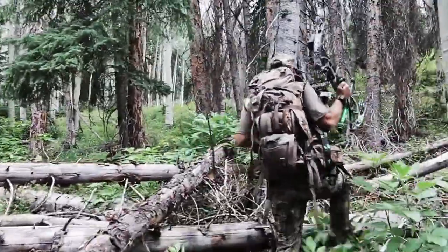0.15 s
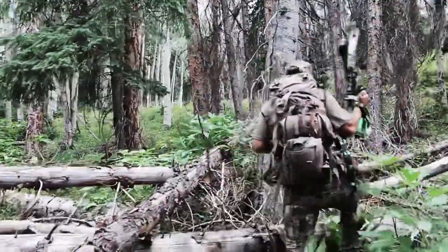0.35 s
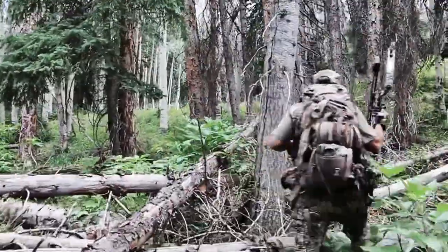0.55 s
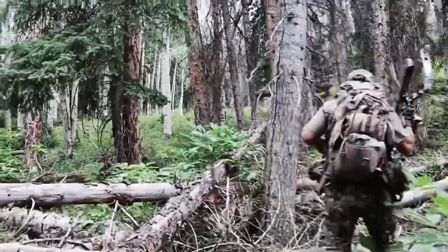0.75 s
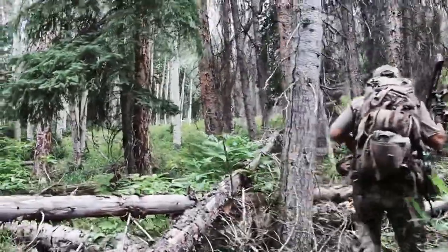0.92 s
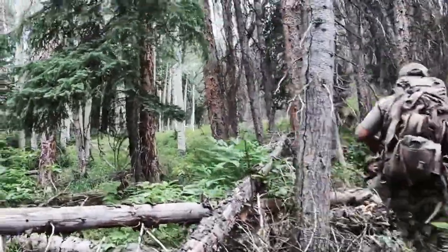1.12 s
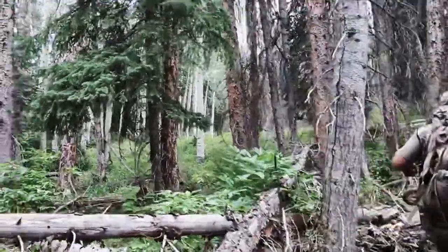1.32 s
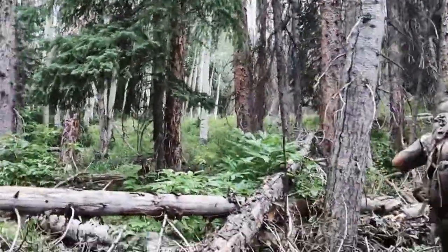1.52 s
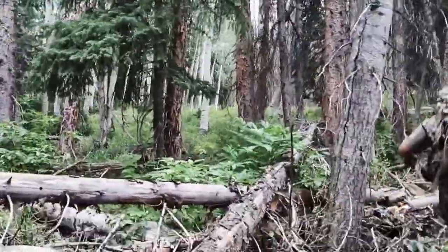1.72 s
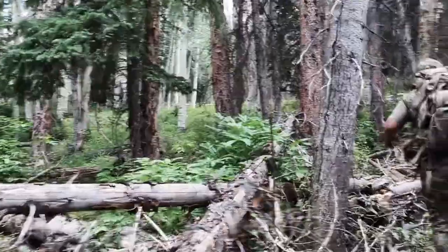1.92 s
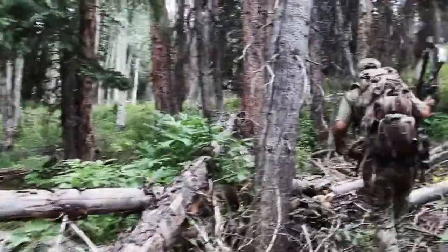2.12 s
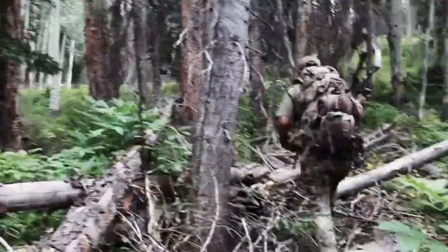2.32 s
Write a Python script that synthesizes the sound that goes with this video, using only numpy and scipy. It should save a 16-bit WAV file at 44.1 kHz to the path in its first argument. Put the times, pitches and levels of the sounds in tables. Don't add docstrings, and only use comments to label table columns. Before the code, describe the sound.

Close, dry stereo sound of boots breaking deadwood on a forest floor: small snaps, a loud hollow break, another cracking step, scattered ticks, then the sharpest crack and settling litter, over very faint low air.

```python
import sys
import numpy as np
from scipy import signal
from scipy.fft import rfft, irfft, next_fast_len
from scipy.io import wavfile
from scipy.ndimage import uniform_filter1d, map_coordinates

SR = 44100
rng = np.random.default_rng(int(sys.argv[2]) if len(sys.argv) > 2 else 0)


def linear_from_db(decibels):
    return 10 ** (np.asarray(decibels, float) / 20)


def int16_out(signal):
    q = np.round(np.clip(np.atleast_2d(signal).T, -1, 1) * 32767)
    wavfile.write(sys.argv[1], SR, q.astype(np.int16))


N = 103635

# (frequency [Hz], density [dB per Hz])
BUFFET_SPECTRUM = [(20, -12), (60, -2), (150, 4), (400, -36), (600, -120)]
# (time [s], litter pressure [dB], leaf brushing [dB])
STRIDE_LEVELS = [(0,-43,-47.5),(.185,-39.5,-48),(.23,-33,-43.5),(.33,-31,-45),(.45,-37,-46.5),(0.529,-25.5,-36),(.66,-40,-47.5),(.75,-39,-48.5),(.83,-46,-46),(1.05,-36,-41.5),(1.12,-33.5,-46),(1.27,-41.5,-52),(1.45,-39,-53),(1.56,-38,-48),(1.75,-42,-48),(1.89,-41,-40),(1.97,-42,-48),(2.1,-46,-42.5),(2.35,-39.5,-51)]
# (frequency [Hz], density [dB per Hz])
LITTER_SPECTRUM = [(15, -56), (25, -41), (106, -1), (374, -1), (894, -5.5), (1000, -0.5), (1410, -6.5),
                   (3090, -12.5), (6000, -20.5), (7800, -38), (13200, -120)]
# (frequency [Hz], density [dB per Hz])
LEAF_SPECTRUM = [(1470, -5), (2500, -3), (4470, -6), (9140, -8), (13900, -14), (15500, -13.5), (16400, -30)]
# (frequency [Hz], width [Hz], gain [dB])
GEAR_RESONANCES = [(1250, 40, 3.5), (2970, 310, 0.5), (4940, 170, 3)]
# (frequency [Hz], correlation [0..1])
PORT_LIKENESS = [(30, 0.97), (500, 1), (1500, 0.97), (4000, 0.17), (12000, 0.059)]
# (time [s], peak [dB], pitch [Hz], life [cycles])
BOOT_KNOCKS = [(.013,-26,403,3.4),(.025,-23.5,395,4.9),(0.035,-28,407,3.2),(0.067,-32,294,3.8),(0.22,-29,390,1.5),(0.28,-36,490,4.1),(.305,-19.5,517,3),(.428,-27,580,3.5),(0.474,-22.5,393,2.4),(.478,-20,617,4),(0.512,-4.5,356,1.08),(.535,-15.5,143,2.1),(.632,-7,684,2),(0.65,-9,546,1.26),(0.713,-27,295,2.6),(0.72,-20.5,286,1.8),(0.7731,-19.5,770,1.35),(1.105,-21,604,3),(1.137,-35,596,4),(1.159,-16.5,634,1.5),(1.437,-13.5,298,1.35),(1.543,-31,143,2.8),(1.708,-15,396,1.1),(1.7854,-16,475,1.44),(1.8095,-10.5,690,2.5),(1.913,-16,754,1.67),(1.918,-21.5,142,1.26),(2.0559,-17.5,329,2),(2.062,-16,410,2),(2.080,-17,450,2.04),
               (.005,-37,118,2.7),(0.052,-39.5,87,4.2),(.12,-31.5,227,3.5),(.225,-29.5,158,2.8),(.776,-29.5,263,1.8),(1.537,-24,123,1.9),(1.5236,-16,890,1.8),(1.732,-29.5,377,3.5),(1.745,-27,750,2),(2.038,-25,600,1.5),(1.3775,-34,500,1.5),(2.10,-41,111,3.3),(2.24,-37,196,4.2),(0.331,-31,100,2),(.375,-38,110,1.9),(0.576,-29,80,3),(1.001,-38.5,71,2),(1.331,-40,205,4),(1.399,-37,70,1.7),(1.47,-34,45,2),(.102,-33,410,3.8),(1.442,-25.5,650,3.4),(1.453,-26.5,346,2),(0.7222,-34,500,1.5),(.756,-40,800,1.8),(1.604,-31,750,3.8),(2.283,-32,228,3.1)]
# (time [s], level [dB], t60 [s], brightness [dB per octave])
TWIG_SNAPS = [(0.169,-27,0.018,-4.5),(0.2015,-15,0.014,-2),(0.206,-17,.03,11),(0.2183,-25,.018,-5),(.286,-26,.012,-11),(0.3192,-24,.02,-0.5),(0.402,-21,0.032,-6.5),(0.4366,-25,0.019,3.5),(0.4717,-22.5,0.018,4),(0.4933,-17.5,0.035,-2),(0.5056,-6,0.023,-2),(.5234,-18.5,.03,-2),(.551,-22.5,0.016,1),(0.632,-26,0.011,2),(1.046,-36,.012,-7),(1.0802,-16.5,0.0076,2),(1.0888,-19,0.014,14),(1.0931,-13,.013,11),(1.139,-25.5,.01,-2),(1.1587,-11.5,0.008,-2),(1.1902,-20,0.0069,-4.5),(1.2137,-21.5,0.0066,-4.5),(1.232,-35,0.009,-2),(1.2442,-34,.012,8),(1.4133,-30,.015,-7),(1.437,-26.5,0.026,-7.5),(1.5223,-26,0.0083,-7),(1.5338,-25.5,.015,8),(1.5375,-28.5,0.023,8),(1.553,-23.5,.04,-4.5),(1.5786,-27,.015,-8),(1.6135,-22.5,.009,-4.5),(1.834,-38,0.01,1),(1.853,-14.5,0.0094,16),(1.912,-9.5,.016,-2),(1.915,-27,0.064,8),(2.026,-26,0.01,-1),(2.036,-21,0.042,-2),(2.0614,-1,0.0095,1),(2.067,-5.5,.012,3.5),(2.0797,-5,0.016,0.5),(2.086,-28,0.016,4),(2.1943,-20,0.012,3.5),(2.209,-21,0.0086,6),(2.2802,-27,0.012,-1),(2.3048,-34,.012,9)]
# (frequency [Hz], density [dB per Hz])
CRACK_SPECTRUM = [(350, -73), (600, -5), (3070, -4), (4710, 2), (5260, 1), (6750, 0.5), (15000, -20),
                  (16400, -26)]
# (start [s], length [s], level [dB], pitch [Hz], width [Hz])
STRAP_RUBS = [
    (0.208,0.16,-44.5,5050,350),
    (0.694,.04,-41,2300,400),
    (1.46,0.033,-42,1250,200),
    (1.466,0.03,-44.5,2950,400),
    (1.269,.14,-55,2980,400),
    (1.28,0.12,-48,1210,250),
    (1.929,0.17,-45,1250,200),
    (2.115,0.18,-43,2690,500),
    (2.12,0.22,-46,1220,250),
]
# (time [s], peak [dB], pitch [Hz], t60 [s])
RINGING_STICKS = [(.2934,-15,1110,0.025),(0.3183,-13.5,1230,0.026),(.403,-9.5,1680,0.017),(.405,-13.5,3050,.015),(1.8526,-8,3250,0.0082),(1.537,-11.5,4420,0.017),(0.4918,-1.5,1614,0.033),(.504,3.5,2280,0.02),(0.5034,0.5,1277,0.043),(0.5208,-1.5,2230,0.034),(0.5279,-4,1250,0.018),(0.568,-9.5,1250,0.046),(.6932,-20,3570,0.011),(0.727,-16,1297,0.062),(.778,-16,1820,0.036),(.788,-19.5,1810,0.036),(1.0801,-7.5,1310,0.011),(.705,-21.5,2250,0.091),(1.0883,3.5,2735,0.028),(1.09,-2.5,1002,0.054),(1.243,-22.5,2240,.015),(1.354,-19.5,1150,0.022),(1.3771,-15.5,1210,0.018),(1.524,-21,1290,0.023),(1.5347,-3.5,850,0.022),(1.731,-21,1180,0.04),(1.854,-15,1068,0.032),(2.037,-16,4230,0.011),(2.0619,11.5,4710,0.0045),(2.067,-12,1980,0.019),(2.0835,-4.5,2550,.02),(2.323,-17,620,0.026),(2.3344,-24,1970,0.03)]

PORT_LAG_SAMPLES = 1.3


def unit(x):
    return x / np.sqrt(np.mean(x ** 2) + 1e-20)


def along(points, hz):
    f, v = np.transpose(points)
    return np.interp(np.log(hz + 1), np.log(f + 1), v)


def wobble(rate_hz):
    knots = rng.standard_normal(int(N * rate_hz / SR) + 4)
    return map_coordinates(knots, [np.arange(N) * rate_hz / SR])


def filtered(x, response):
    n = x.shape[-1]
    m = next_fast_len(n + 2048)
    spectrum = rfft(x, m) * response(np.fft.rfftfreq(m, 1 / SR))
    return irfft(spectrum, m)[..., :n]


def ports(x, lag_samples):
    side = np.array([[1], [-1]])
    return filtered(x, lambda hz: np.exp(-1j * np.pi * hz * lag_samples / SR * side))


def add(track, time_s, sound):
    part = track[..., round(time_s * SR):][..., :sound.shape[-1]]
    part += sound[..., :part.shape[-1]]


def buffet():
    lumps = linear_from_db(8.1 * np.array([wobble(8.8), wobble(8.5)]))
    air = filtered(rng.standard_normal((2, N)), lambda hz: linear_from_db(along(BUFFET_SPECTRUM, hz)))
    return linear_from_db(-62) * unit(lumps * air)


def rustle(spectrum, count, spread_db, share, clump_db):
    clicks = np.zeros((2, N))
    for row in clicks:
        size = linear_from_db(spread_db * rng.standard_normal(count))
        row[rng.integers(0, N, count)] = rng.choice([-1, 1], count) * size
    pair = np.sqrt(1 - share) * rng.standard_normal((2, N)) + np.sqrt(share) * unit(clicks)
    low = filtered(pair, lambda hz: 1 / (1 + (hz / 800) ** 4))
    high = pair - low
    pair = low * linear_from_db(clump_db * wobble(39.93)) + high * linear_from_db(clump_db * wobble(70))

    def mid_side(hz):
        gear_db = sum(db / (1 + (2 * (hz - c) / width) ** 2) for c, width, db in GEAR_RESONANCES)
        angle = np.arccos(np.clip(along(PORT_LIKENESS, hz), -1, 1)) / 2
        return linear_from_db(along(spectrum, hz) + gear_db) * [np.cos(angle), np.sin(angle)]

    mid, side = filtered(pair, mid_side)
    return unit(ports(np.array([mid + side, mid - side]), PORT_LAG_SAMPLES))


def litter():
    time_s, litter_db, leaf_db = np.transpose(STRIDE_LEVELS)
    t = np.arange(N) / SR
    crunch = rustle(LITTER_SPECTRUM, count=2500, spread_db=2.5, share=0.26, clump_db=2.89)
    brush = rustle(LEAF_SPECTRUM, count=5000, spread_db=1.0, share=0.21, clump_db=2.03)
    crunch_gain = linear_from_db(np.interp(t, time_s, litter_db) + 1.5)
    brush_gain = linear_from_db(np.interp(t, time_s, leaf_db) + 5.0)
    return crunch_gain * crunch + brush_gain * brush


def knocks():
    out, t = np.zeros(N), np.arange(3000) / SR
    for time_s, peak_db, hz, cycles in BOOT_KNOCKS:
        life = t * hz / cycles
        envelope = life ** 0.78 * np.exp(-4.5 * life)
        swing = -np.sin(2 * np.pi * hz * t) * envelope
        add(out, time_s, linear_from_db(peak_db + 0.5) * swing / abs(swing).max())
    return ports(out, PORT_LAG_SAMPLES)


def trunks(x):
    t, t60_s = np.arange(9000) / SR, 0.08
    tail = rng.standard_normal(len(t)) * linear_from_db(-60 * t / t60_s) * (t > 0.003)
    return signal.fftconvolve(x, tail[None] / np.linalg.norm(tail), axes=1)[:, :N]


def snaps():
    snap_db, tail_db, tail_longer = -3, -16.5, 4.1
    lag_samples, rise_s = 3.43, 0.00023
    first_fibre = 8.3
    out, t = np.zeros((2, N)), np.arange(6000) / SR
    for time_s, db, t60_s, bright_db in TWIG_SNAPS:
        own = rng.standard_normal((2, len(t)))
        own = filtered(own, lambda hz: hz ** 2 / (hz ** 2 + 2500 ** 2))
        shared = rng.standard_normal(len(t))
        shared[8] += first_fibre * np.sign(shared[8])

        def colour(hz):
            tilt_db = bright_db * np.log2(np.maximum(hz, 900) / 5000)
            return linear_from_db(along(CRACK_SPECTRUM, hz) + tilt_db)

        lag = lag_samples + 0.98 * rng.standard_normal()
        burst = unit(filtered(ports(shared, lag) + 0.56 * own, colour))
        fall = linear_from_db(-60 * t / t60_s) + linear_from_db(tail_db - 60 * t / (t60_s * tail_longer))
        add(out, time_s, linear_from_db(db + snap_db) * burst * fall * (1 - np.exp(-t / rise_s)))
    return out


def rubs():
    out, span = np.zeros(N), N // 8
    for start_s, length_s, db, hz, width_hz in STRAP_RUBS:
        n = round(length_s * SR)
        band = filtered(rng.standard_normal(span), lambda f: 1 / (1 + (2 * (f - hz) / width_hz) ** 2))
        grip = linear_from_db(2.8 * wobble(97))[:span]
        swell = np.hanning(n) ** 0.4
        add(out, start_s, linear_from_db(db) * unit(band * grip)[:n] * swell)
    return ports(out, PORT_LAG_SAMPLES)


def sticks():
    stick_db, rough_rad, rise_s = -8.5, 0.64, 0.00039
    out, t = np.zeros(N), np.arange(4000) / SR
    for time_s, peak_db, hz, t60_s in RINGING_STICKS:
        drift = unit(uniform_filter1d(rng.standard_normal(len(t)), size=40))
        phase = 2 * np.pi * hz * t + rough_rad * drift
        modes = np.sin(phase) + 0.32 * np.sin(1.3 * phase) + 0.21 * np.sin(0.68 * phase)
        ring = modes * linear_from_db(-60 * t / t60_s) * (1 - np.exp(-t / rise_s))
        add(out, time_s, linear_from_db(peak_db + stick_db) * ring / abs(ring).max())
    return ports(out, PORT_LAG_SAMPLES)


def scene():
    wood = knocks() + snaps() + sticks()
    scatter = linear_from_db(-19) * trunks(wood)
    return buffet() + litter() + wood + scatter + rubs()


def roll_off(x):
    return signal.sosfilt(signal.butter(12, 16500, fs=SR, output="sos"), x)


def record(dry):
    low_cut_hz, top_hz = 87, 16000

    def response(hz):
        low_cut = (1j * hz / (low_cut_hz + 1j * hz)) ** 2
        return np.where(hz < top_hz, 1, 0.05) * low_cut

    mix = np.clip(filtered(dry, response), -1, 1)
    return roll_off(mix)


dry = scene()
out = record(dry)
int16_out(out)
```